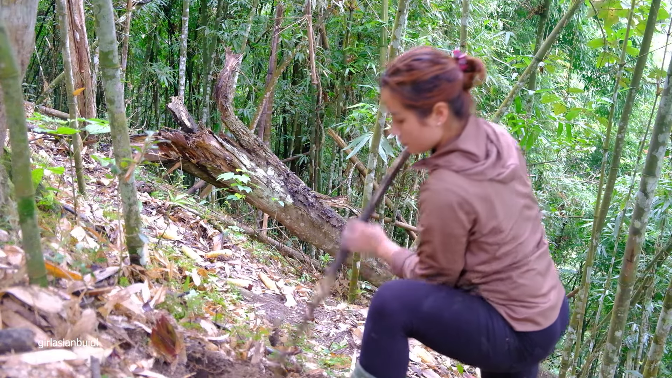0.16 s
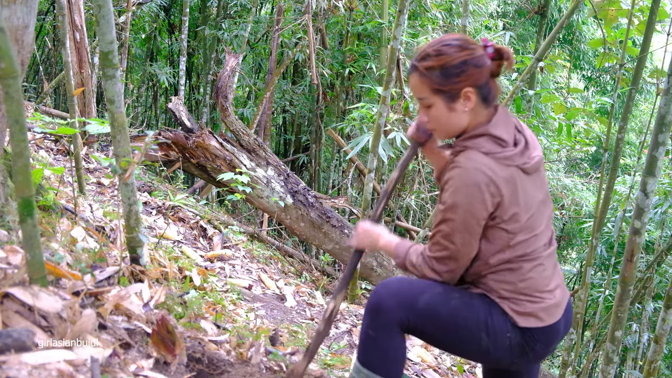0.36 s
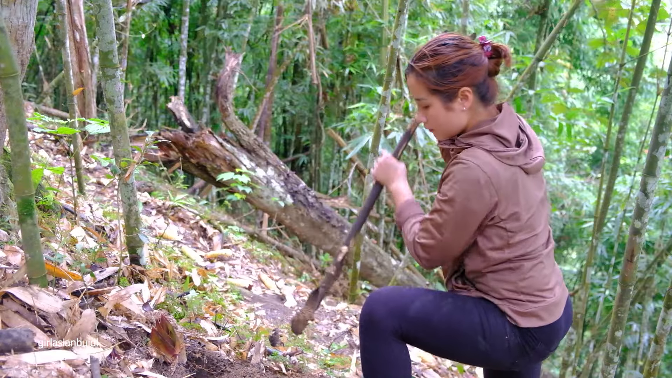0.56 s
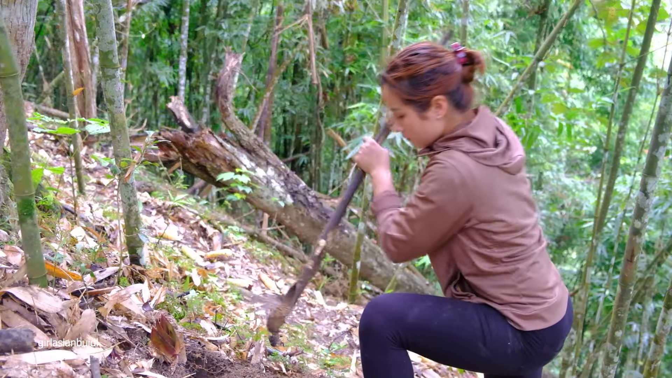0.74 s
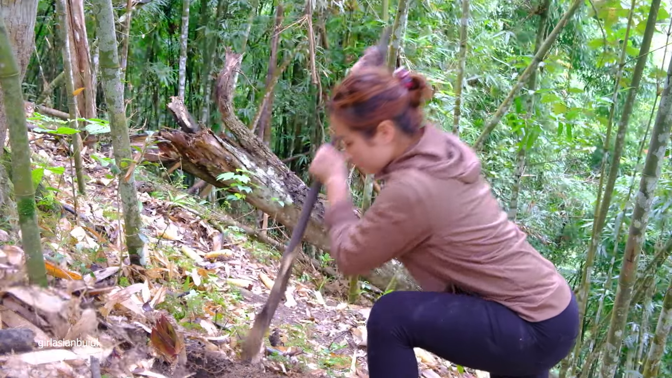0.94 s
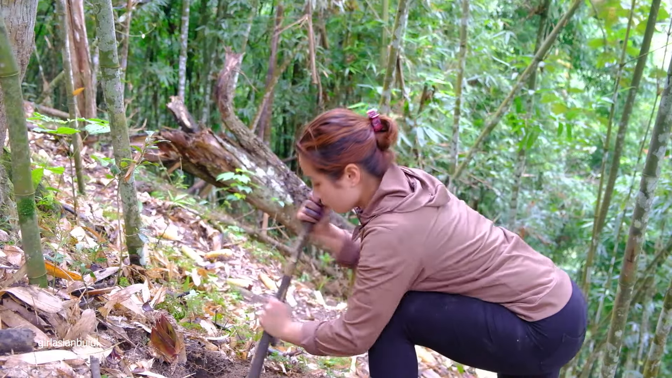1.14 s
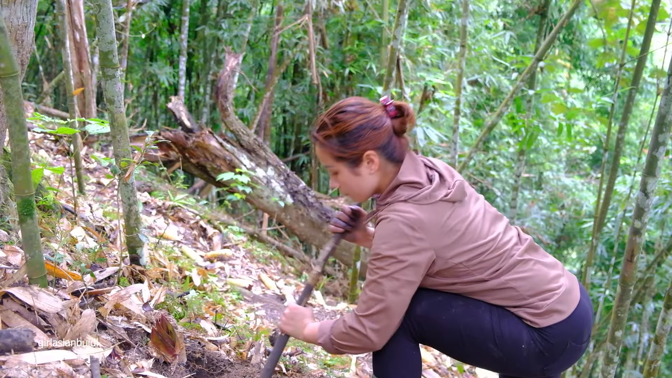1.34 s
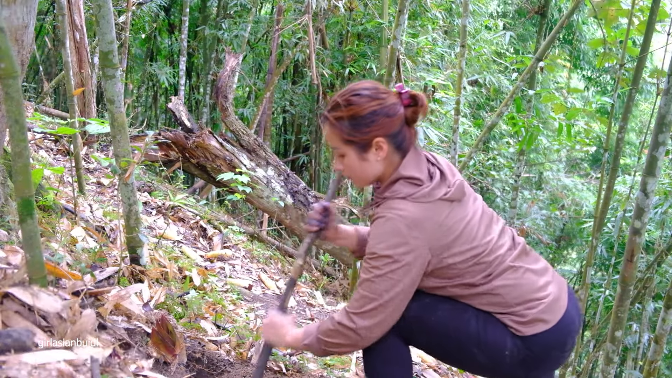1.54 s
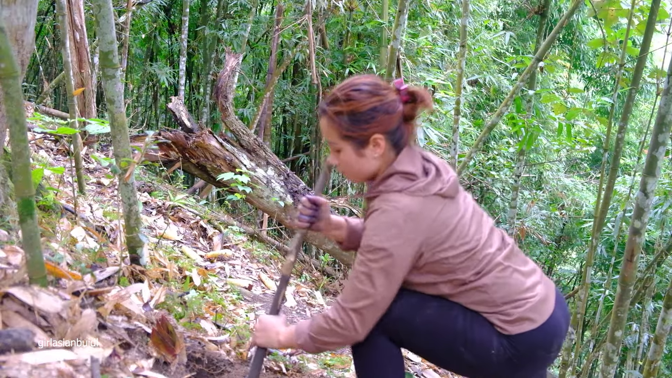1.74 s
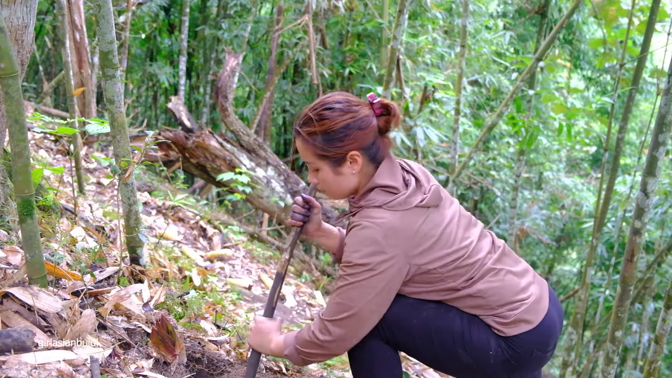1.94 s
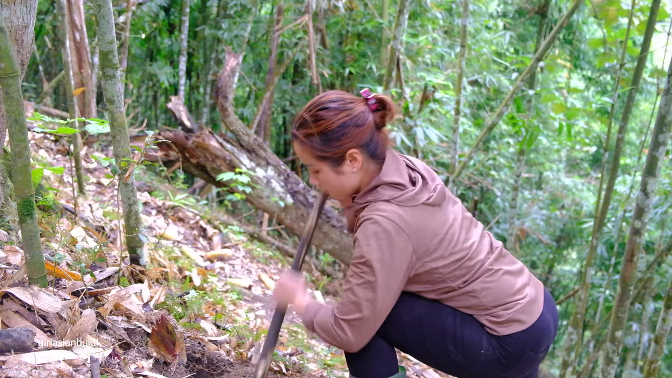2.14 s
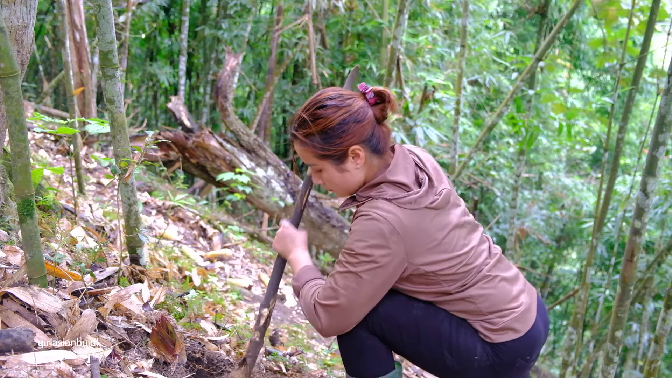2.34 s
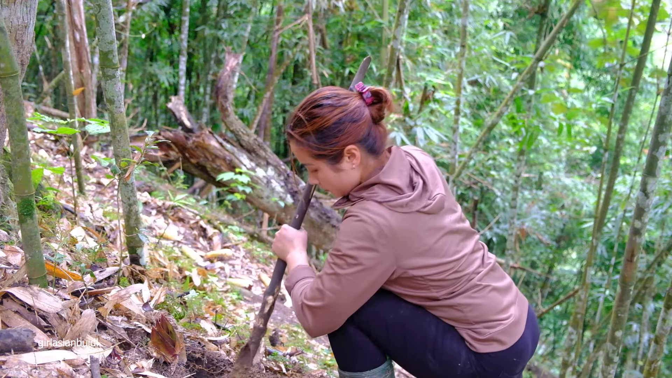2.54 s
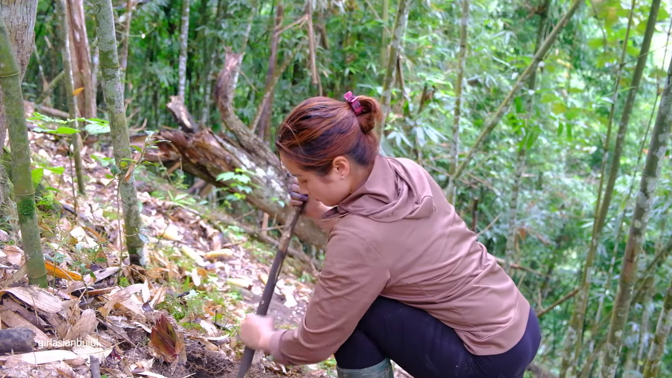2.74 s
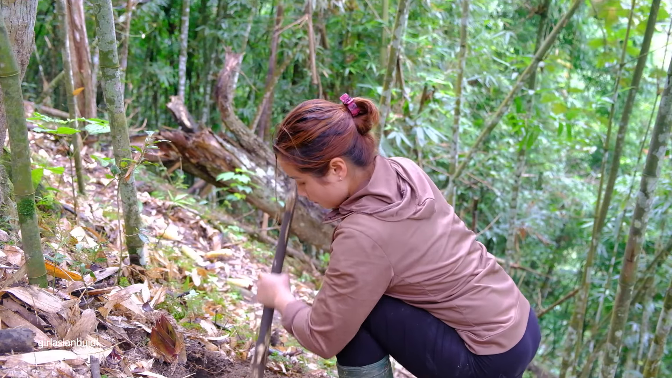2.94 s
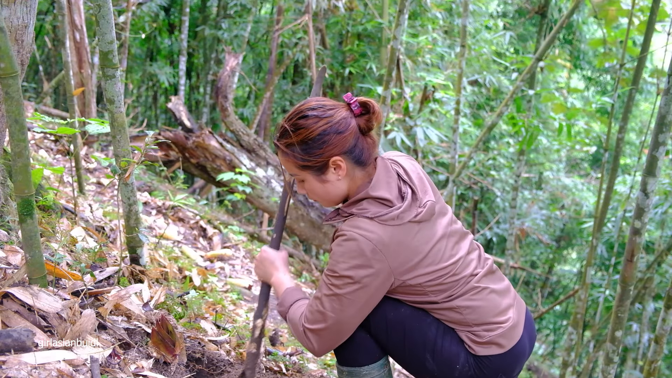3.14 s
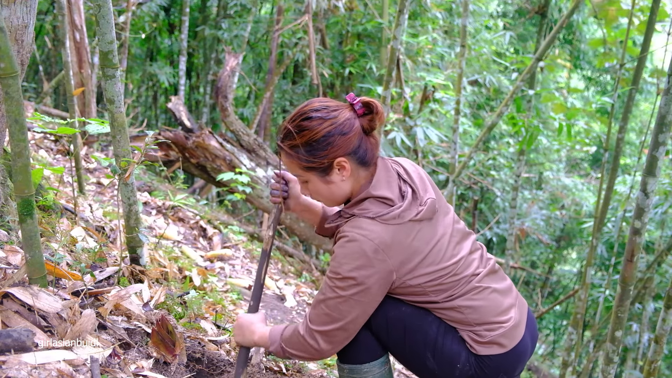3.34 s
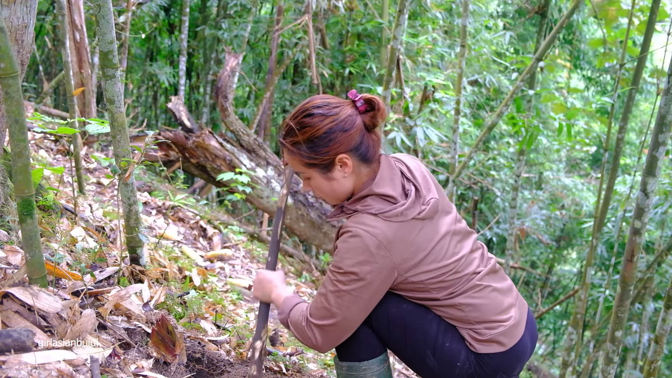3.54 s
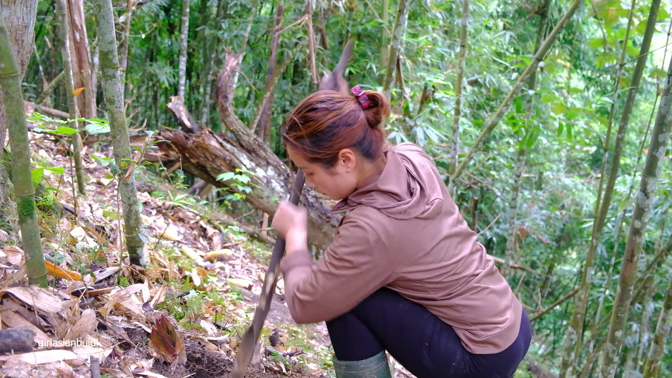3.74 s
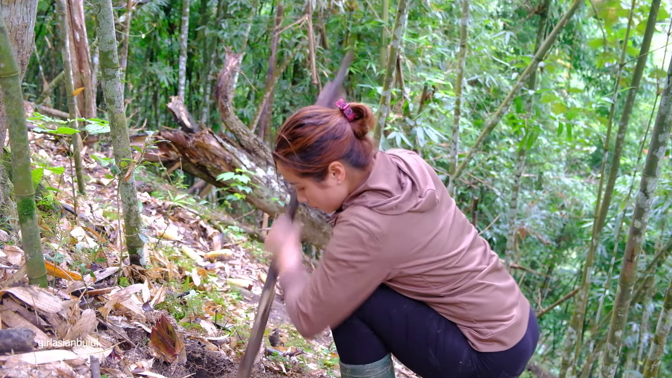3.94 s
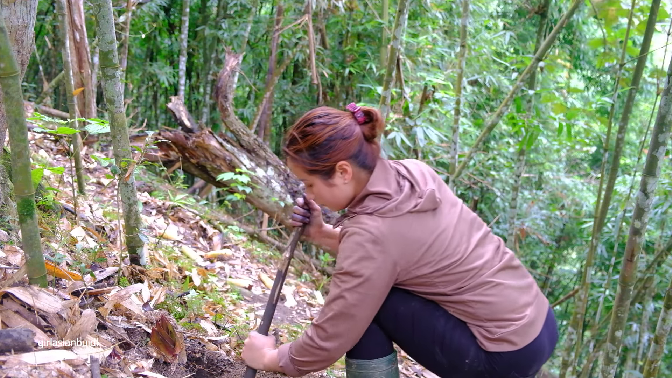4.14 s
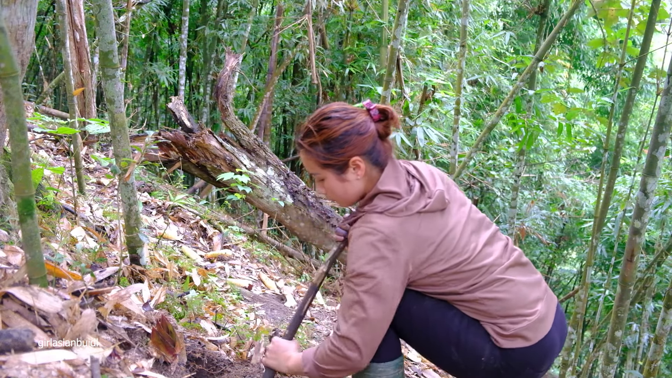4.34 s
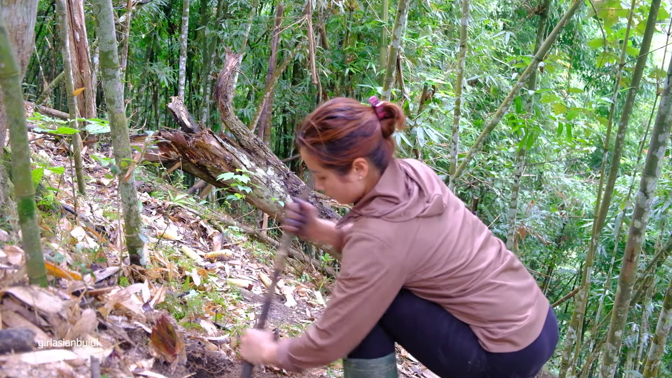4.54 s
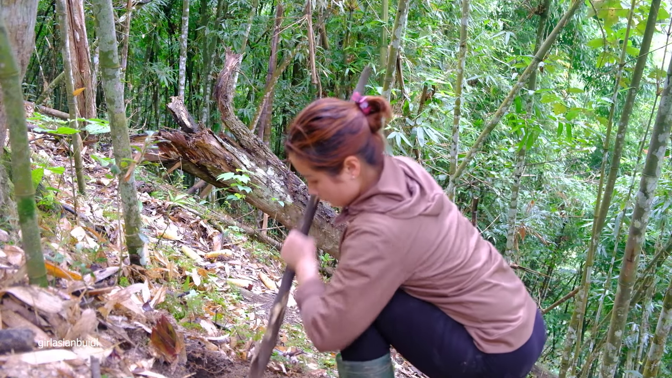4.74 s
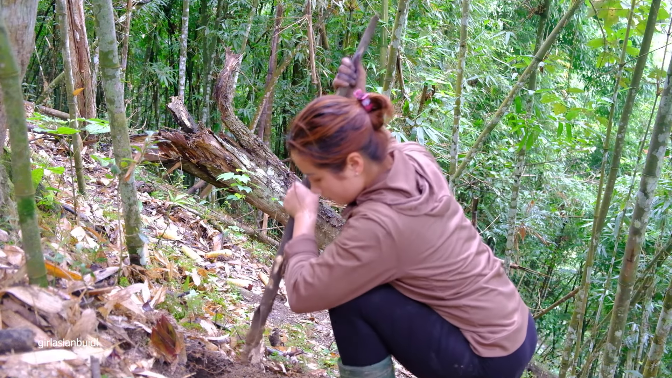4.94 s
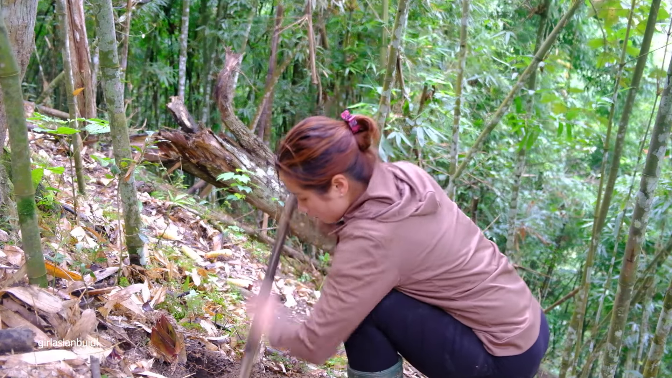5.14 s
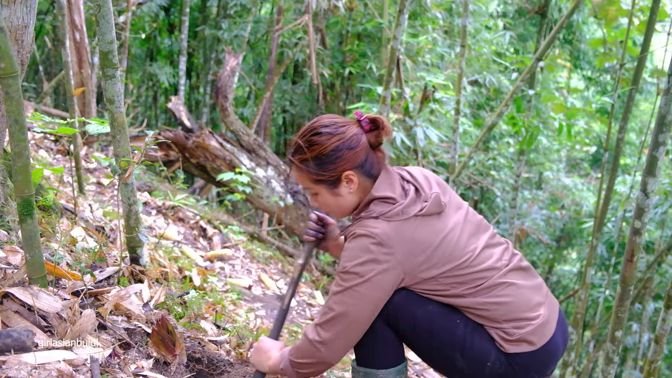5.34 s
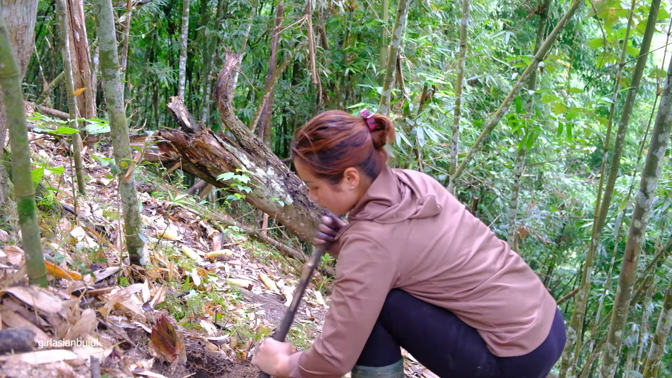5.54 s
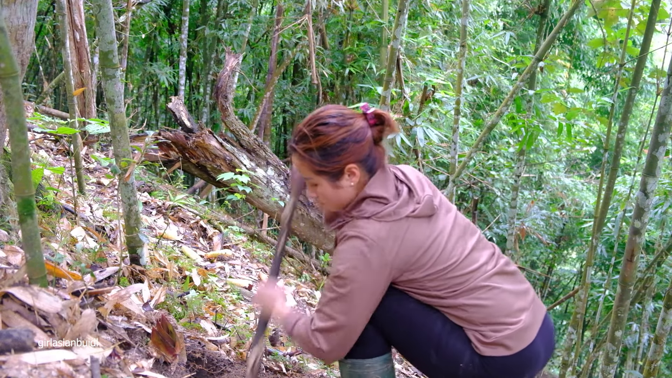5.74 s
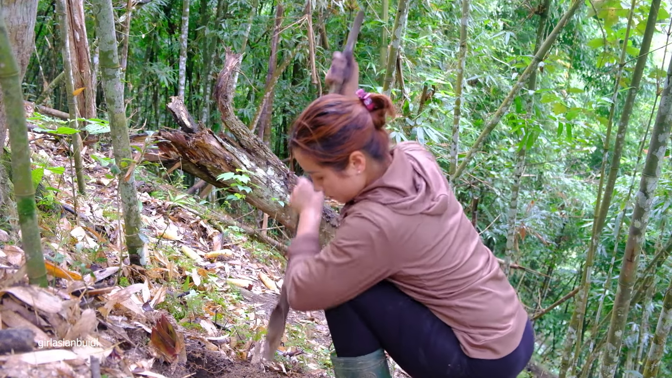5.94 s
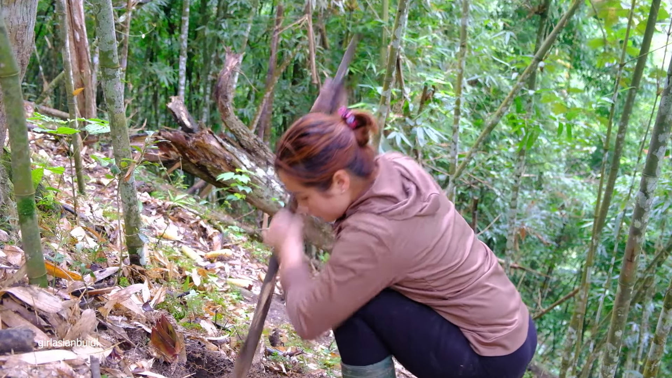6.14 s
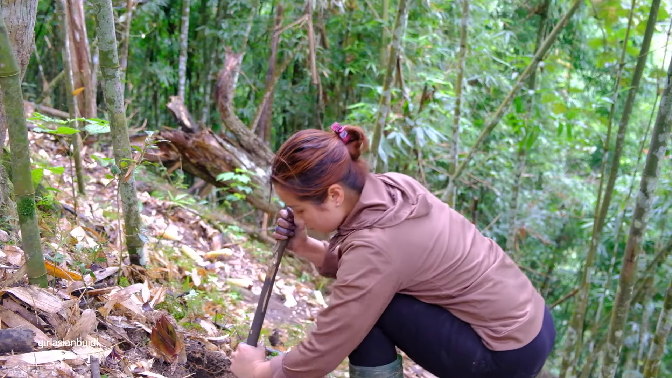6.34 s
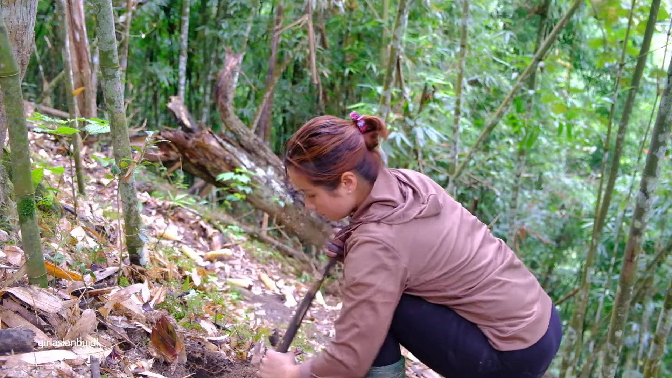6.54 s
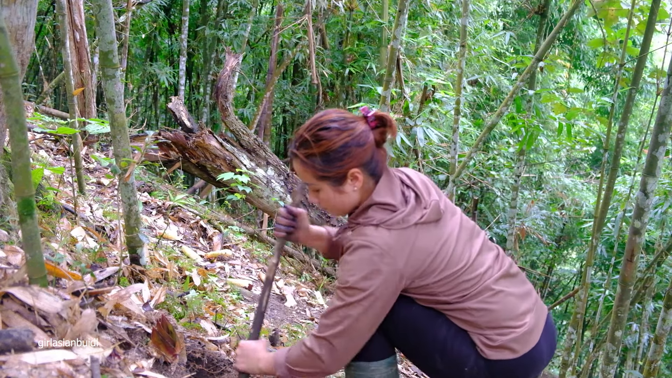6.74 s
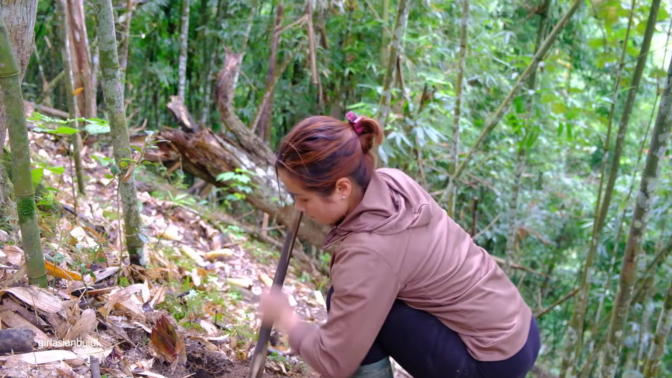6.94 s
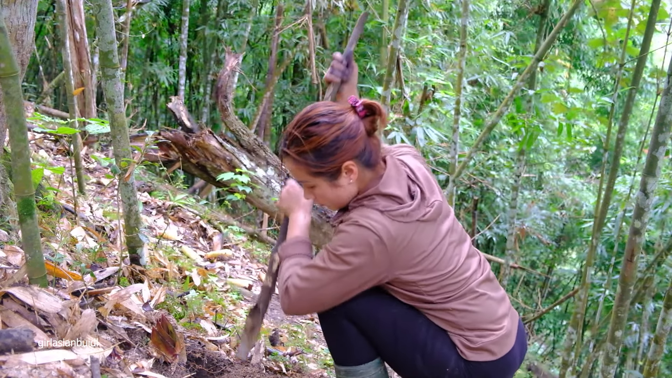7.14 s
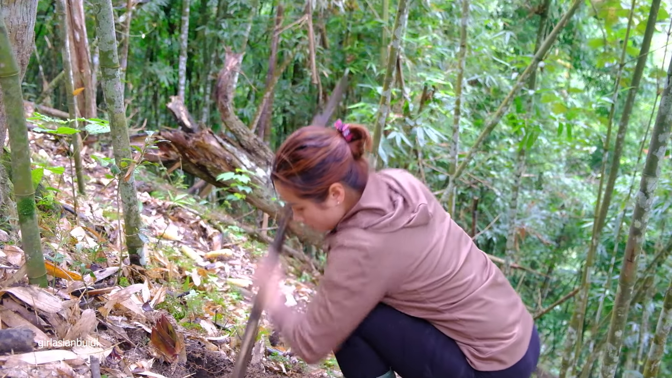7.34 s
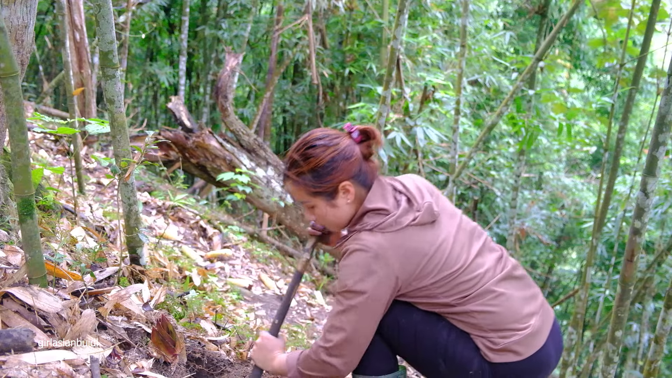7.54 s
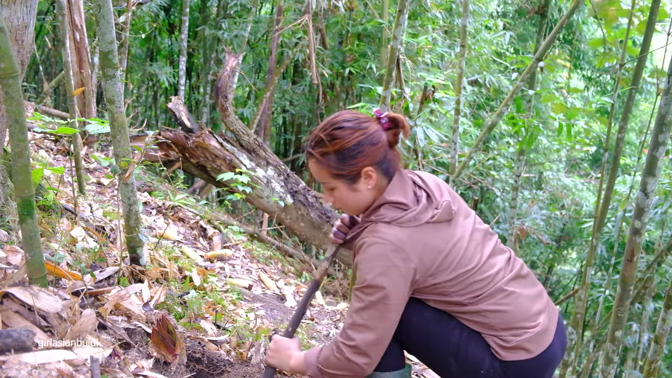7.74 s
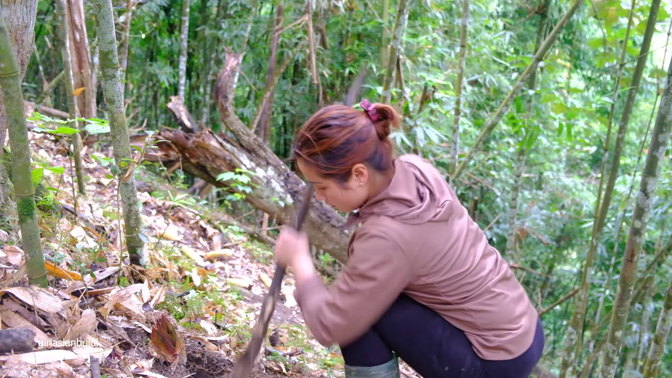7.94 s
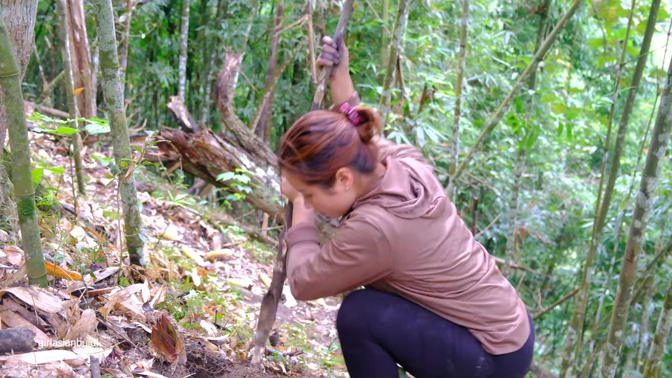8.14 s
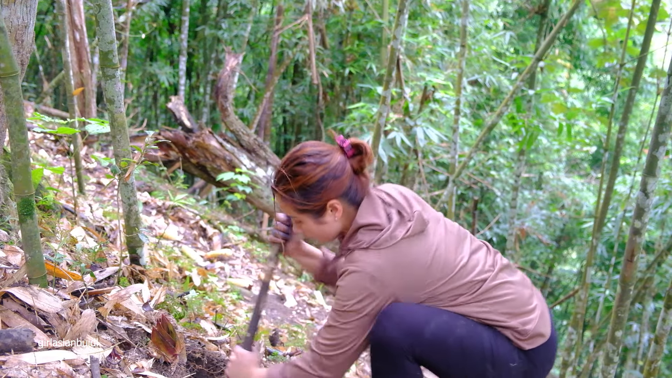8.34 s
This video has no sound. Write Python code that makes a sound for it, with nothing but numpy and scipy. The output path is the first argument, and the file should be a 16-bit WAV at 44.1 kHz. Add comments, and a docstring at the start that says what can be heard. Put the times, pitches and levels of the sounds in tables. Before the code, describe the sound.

A heavy metal digging bar strikes rooty soil close to a stereo microphone, eight times in eight seconds. Each blow is a short woody knock and dull thud with gritty cracking, a brief damped metallic clank and crumbs trickling. Light scuffs fall between. Around it, insects drone steadily outdoors and a farther cicada rasps upward every 1.6 seconds; a distant engine hums barely audibly.

```python
"""Forest floor: a long steel digging bar chops eight times into rooty soil; bar and boots scuff it around the blows.
Each blow: fractures of roots and grit, damped swings for knock and thud, a ground shudder, a spill of crumbs.
A jolt on entry, a jolt on stopping and random chatter ring the bar's modes. Insects drone all around
(shaped noise) in still air, one cicada repeats a rising rasp (buzz on a gliding carrier plus hiss),
a small insect chirrs once close by, and an engine hums far away (three sine lines)."""
import sys
import numpy as np
from scipy import signal
from scipy.fft import rfft, irfft, next_fast_len
from scipy.io import wavfile
from scipy.ndimage import uniform_filter1d, map_coordinates

SR = 44100
rng = np.random.default_rng(int(sys.argv[2]) if len(sys.argv) > 2 else 0)


def wrap_up_sound(samples):
    """Save the sound to the file named by the first command line argument, as 16-bit audio."""
    columns = np.atleast_2d(samples).T
    # keep every value between -1 and 1, then stretch to whole-number steps
    tamed = np.clip(columns, -1, 1)
    steps = np.round(tamed * 32767).astype(np.int16)
    wavfile.write(sys.argv[1], SR, steps)


N = 369909

# blows: blade stop t/s, travel through soil/s, force/dB, knock f/Hz, then knock, thud, ground level/dB over force
BLOWS = [(1.1246, 0.0029, -29, 390, 9.5, -15, -8), (2.793, 0.0029, -30.5, 340, 7.5, 6, -11),
         (3.3303, 0.016, -35.5, 387, 4.5, -3.5, -19), (4.0719, 0.0023, -28.5, 413, 11, 3.5, -6),
         (5.234, 0.0094, -30, 401, 7.5, 4, -7), (6.2943, .010, -30.5, 342, 4, -2, -8),
         (7.4369, 0.0019, -20.5, 345, 6, 2, -15), (8.3732, 0.014, -27.5, 345, -6, -24, -9)]
# blade edge snaps a twig or meets a pebble: t/s, level/dB
SNAPS = [(1.1088, -31), (2.7702, -37), (2.785, -40), (3.3112, -35.5), (4.0689, -28.5), (7.4342, -25),
         (7.4383, -22.5), (8.3544, -34)]
# bar and boots scuff the soil: t/s, decay each side/s, level/dB, contact hardness/dB
SCUFFS = [(.274, 0.0096, -46.5, 3.5), (0.382, 0.018, -59.5, 7), (0.579, 0.09, -51, -4),
          (1.427, 0.0073, -54, -10), (2.16, .012, -51.5, -3), (2.178, 0.0045, -37, -7.5),
          (2.937, 0.027, -49.5, -17), (4.667, .013, -51, 2), (5.755, 0.011, -49.5, -3),
          (6.585, 0.014, -51.5, -2), (6.955, 0.017, -52, -2), (7.692, 0.036, -53.5, -30),
          (7.882, 0.009, -46.5, -13)]
# bending modes of the bar, damped by hands and soil: f/Hz, width/Hz, relative level/dB
BAR_MODES = [(588, 54, 2.5), (797, 67, 4), (985, 300, -4), (1250, 79, 5), (1557, 61, 1.5), (1960, 170, -2),
             (3124, 210, -1), (3366, 100, -1.5)]
# relative spectra of grit, soil, forest floor: f/Hz, density/dB per Hz
GRIT_SPECTRUM = [(300, -15.5), (1200, 3.5), (2000, -0.5), (3100, 3.5), (4800, 1.5), (6500, -1.5),
                 (9000, -7.5), (12000, -14), (14000, -9.5), (16000, -22)]
SOIL_SPECTRUM = [(30, -28), (100, -10), (220, -5.5), (380, -0.5), (700, -10.5), (1300, -15), (2200, -16.5),
                 (4500, -18), (12000, -72)]
GROUND_SPECTRUM = [(15, -20), (28, -4.5), (55, -2), (100, 0.5), (140, -1), (220, -13), (500, -51),
                   (2000, -85)]
# cicada calls: t/s, level/dB
CALLS = [(.105, -42.5), (1.727, -42.7), (3.35, -42.7), (4.98, -42.5), (6.581, -42.7), (8.199, -43)]
# sidebands of the tymbal buzz: offset from pitch/multiples of buzz rate, level/dB
SIDEBANDS = [(-1, -10), (0, -5), (1, -10), (2, -14)]
# relative spectrum of the cicada's hiss: f/Hz, density/dB per Hz
HISS_SPECTRUM = [(5500, -5), (7500, -5.5), (8600, -4.5), (9900, -1.5), (11300, -4.5), (12000, -12.5),
                 (12900, -19), (14300, -12), (15500, -11.5)]
# scatter from the stems: f/Hz, relative level/dB
SCATTER = [(200, 3), (1000, -14), (3500, 14)]
# decay of the scatter: f/Hz, t60/s
FOREST_T60 = [(100, 0.51), (500, 0.12), (3000, 0.17), (6000, 0.58), (14000, 0.32)]
# relative spectra of insect chorus and still air: f/Hz, density/dB per Hz
CHORUS_SPECTRUM = [(1500, -32.5), (2000, -8.5), (2450, 0.5), (3200, 0), (3700, -10.5), (4400, -7),
                   (5050, -6.5), (6000, -14.5), (7000, -23), (8500, -33.5), (15000, -42)]
AIR_SPECTRUM = [(15, -15), (35, 4), (50, 9), (65, 6), (150, 1.5), (230, 0), (700, -0.5), (1050, -1),
                (1270, 0), (1500, -3.5), (4000, -3.5), (8000, -17), (15000, -26)]
# left-right likeness of chorus and air: f/Hz, correlation/1
LIKENESS = [(30, 0.11), (150, 0.35), (1000, 0.66), (2800, 0.75), (5000, 0.16), (9000, 0.1)]
# far engine speed: t/s, turns per second/Hz
ENGINE_SPEED = [(0, 36.5), (1, 34.5), (1.701, 35.5), (3.7, 33.5), (4.7, 33), (8.4, 34.5)]
# far engine lines: multiple of the turn rate/1, level/dB
ENGINE_LINES = [(3, -71.5), (4, -68), (5, -74)]

# gains over blow force
ENTRY_JOLT_DB, STOP_JOLT_DB, DRAG_DB, GRIT_DB = 17.5, 20.5, -4, -7
CRUMBS_DB, CLODS_DB = -13, -23  # fine and coarse spill
# firmer soil stops the blade sooner and thuds higher
THUD_HZ, THUD_TRAVEL_S, THUD_STIFFENING_POWER = 165.5, 0.004, 0.18
SCUFF_GRIT_DB, GRIT_DB_PER_HARDNESS_DB = -0.5, 0.61  # harder contact loosens more grit
HEAVE_S, HEAVE_DB = 0.284, -45.5  # bar levered out of the hole
CALL_S, SWELL_S, RELEASE_S = 0.8, 0.16, 0.25
LOW_HZ, HIGH_HZ, CLIMB_S, CLIMB_POWER = 3269, 4872, 0.46, 1.45
HISS_DELAY_S, HISS_RISE_S = 0.046, 0.12
HISS_SAG = 0.1  # share by which the hiss darkens in the release
CHIRR_S, CHIRR_LENGTH_S, CHIRR_HZ, CHIRR_DB = 1.25, 0.55, 6700, -66
TOP_HZ = 15800


def digging():
    """Breaking soil, knocks, ground and ringing bar, driven by the summed envelopes of all contacts."""
    names = ["low", "sway", "jolts", "scrape", "grit", "crumbs", "soil"]
    drive = dict(zip(names, np.zeros((7, N))))
    blows(drive)
    snaps(drive)
    scuffs(drive)
    heave(drive)
    chatter = drive["scrape"] * fractures(rate_hz=3000, spread_db=5)
    ring = filtered(drive["jolts"] + chatter, bar_ring)
    shudder = coloured(drive["sway"] * fractures(rate_hz=3000, spread_db=3.5), GROUND_SPECTRUM)
    breaking = drive["grit"] * fractures(rate_hz=5900, spread_db=6, scatter=0.12)
    trickle = drive["crumbs"] * fractures(rate_hz=3000, spread_db=4.5, scatter=0.97)
    gritty = coloured(breaking + trickle, GRIT_SPECTRUM)
    earthy = coloured(drive["soil"] * fractures(rate_hz=3000, spread_db=-1.0), SOIL_SPECTRUM)
    return drive["low"] + shudder + ring + gritty + earthy


def blows(drive):
    """Roots and grit break while the blade travels; it stops with knock and thud, crumbs trickle after."""
    for s, travel_s, force_db, knock_hz, knock_db, thud_db, ground_db in BLOWS:
        span, t = around(s)
        force = amp(force_db)
        thud_hz = THUD_HZ * (THUD_TRAVEL_S / travel_s) ** THUD_STIFFENING_POWER
        # full level throughout the travel
        cutting = force * burst(t - np.clip(t, -travel_s, 0), rise_s=0.002, t60_s=0.054)
        settling = force * burst(t - 0.008, rise_s=0.0024, t60_s=0.22)
        knock = swing(t, knock_hz, rise_s=0.0025, t60_s=0.038)
        thud = swing(t - 0.003, thud_hz, rise_s=0.0021, t60_s=0.034)
        drive["low"][span] += force * (amp(knock_db) * knock + amp(thud_db) * thud)
        drive["sway"][span] += force * amp(ground_db) * ground(t)
        # bar: jolt on entry, chatter on the way, jolt on stopping
        drive["jolts"][round((s - travel_s) * SR)] += force * amp(ENTRY_JOLT_DB)
        drive["scrape"][span] += amp(DRAG_DB) * cutting
        drive["jolts"][round(s * SR)] += force * amp(STOP_JOLT_DB)
        drive["soil"][span] += cutting + amp(CLODS_DB) * settling
        drive["grit"][span] += amp(GRIT_DB) * cutting
        drive["crumbs"][span] += amp(CRUMBS_DB) * settling


def snaps(drive):
    """A twig or pebble at the blade edge: abrupt onset, short decay of breaking."""
    for s, db in SNAPS:
        span, t = around(s)
        drive["grit"][span] += amp(db) * burst(t, rise_s=0.000055, t60_s=0.011)


def scuffs(drive):
    """Strokes on the soil; harder contact shakes the bar and loosens grit."""
    for s, length_s, db, hard_db in SCUFFS:
        span, t = around(s)
        stroke = amp(db) * np.exp(-np.abs(t / length_s))
        drive["soil"][span] += stroke
        drive["crumbs"][span] += amp(SCUFF_GRIT_DB + GRIT_DB_PER_HARDNESS_DB * hard_db) * stroke
        drive["scrape"][span] += amp(hard_db) * stroke


def heave(drive):
    """Levering the bar out pushes the ground once."""
    span, t = around(HEAVE_S)
    drive["sway"][span] += amp(HEAVE_DB) * ground(t)


def ground(t, lag_s=0.0064):
    """The soft forest floor shudders a moment after it is pushed."""
    return burst(t - lag_s, rise_s=0.0057, t60_s=0.18)


def bar_ring(hz):
    """Response of the bar's short-lived bending modes with alternating signs, at unit power."""
    total = 0
    for k, (centre_hz, width_hz, db) in enumerate(BAR_MODES):
        damping = 1j * hz * width_hz
        total = total + (-1) ** k * amp(db) * damping / (centre_hz ** 2 - hz ** 2 + damping)
    return unit(total)


def swing(t, hz, rise_s, t60_s):
    """Pressure from a damped oscillation (slope of its motion), rms near 1 at its loudest."""
    motion = burst(t, rise_s, t60_s) * np.sin(2 * np.pi * hz * t)
    return np.sqrt(2) * np.gradient(motion, t) / (2 * np.pi * hz)


def fractures(rate_hz, spread_db, scatter=0):
    """Tiny breaks, random in time and size, rms 1; scatter makes each differ between the ears."""
    sizes = amp(spread_db * rng.uniform(-0.77, 1, N)) * rng.choice([-1, 1], N)
    breaks = sizes * (rng.random(N) < rate_hz / SR)
    return unit(breaks * (1 + scatter * rng.standard_normal((2, N))))


def chirr(width_hz=1100, fade_s=0.06, flicker_db=4, flicker_rate_hz=90):
    """A small insect in the near leaf litter: a faint, high, flickering noise band."""
    t = clock() - CHIRR_S
    flicker = amp(flicker_db * wobble(flicker_rate_hz))
    band = unit(wobble(width_hz) * flicker * np.sin(2 * np.pi * CHIRR_HZ * t))
    return amp(CHIRR_DB) * ramp(t, fade_s) * ramp(CHIRR_LENGTH_S - t, fade_s) * band


def cicada(buzz_hz=370, flutter_rate_hz=260, haze_rate_hz=1100, haze_db=-8, octave_db=-23,
           hiss_db=-16, hiss_glide_power=0.45):
    """Ragged tymbal buzz around a resonance pulled upward, held, then released in each call."""
    t = clock()
    climb, level, hiss_level, release = np.zeros((4, N))
    for s, db in CALLS:
        on = (t >= s) & (t < s + CALL_S)
        since = t[on] - s
        climb[on] = ramp(since, CLIMB_S) ** CLIMB_POWER
        release[on] = ramp(since - (CALL_S - RELEASE_S), RELEASE_S)
        held = amp(db) * (1 - release[on])
        level[on] = held * (1 - np.exp(-since / SWELL_S))
        hiss_level[on] = held * ramp(since - HISS_DELAY_S, HISS_RISE_S)
    pitch_hz = LOW_HZ + (HIGH_HZ - LOW_HZ) * climb
    carrier = np.exp(2j * np.pi * np.cumsum(pitch_hz) / SR)
    # uneven clicks blur each sideband into a narrow band
    buzz = 0
    for k, side_db in SIDEBANDS:
        blur = wobble(flutter_rate_hz) + 1j * wobble(flutter_rate_hz)
        buzz = buzz + amp(side_db) * blur * np.exp(2j * np.pi * k * buzz_hz * t)
    # rougher haze around the main band and its octave
    haze = unit(buzz * (wobble(haze_rate_hz) + 1j * wobble(haze_rate_hz)))
    song = np.real(buzz * carrier + haze * (amp(haze_db) * carrier + amp(octave_db) * carrier ** 2))
    # click edges hiss above; slower reading darkens the noise, so it follows pitch and sags in release
    speed = (pitch_hz / HIGH_HZ) ** hiss_glide_power * (1 - HISS_SAG * release)
    read = np.cumsum(speed)
    noise = coloured(rng.standard_normal((2, N)), HISS_SPECTRUM)
    hiss = np.array([map_coordinates(side, [read], order=5) for side in noise])
    return level * song + amp(hiss_db) * hiss_level * hiss


def forest(x):
    """Scatter from the stems: a different diffuse tail at each ear, weakest near 1 kHz."""
    hz, t, z = signal.stft(rng.standard_normal((2, SR // 2)), SR, nperseg=256)
    tail_db = along(SCATTER, hz)[:, None] - 60 * t / along(FOREST_T60, hz)[:, None]
    tail = signal.istft(z * amp(tail_db), SR, nperseg=256)[1]
    return signal.fftconvolve(x, tail / np.linalg.norm(tail[0]), axes=1)[:, :N]


def insect_chorus():
    """Drone of many insects: banded stereo noise of slightly wavering level."""
    return amp(-51.0 + 0.072 * wobble(6.1)) * rush(CHORUS_SPECTRUM, patchy_db=0.97)


def still_air():
    """Faint broad noise of the open air."""
    return amp(-58.0) * rush(AIR_SPECTRUM, patchy_db=1.24)


def engine():
    """Only a few low lines of the far engine carry; speed and levels waver slightly."""
    turns_hz = np.interp(clock(), *np.transpose(ENGINE_SPEED)) + 0.388 * wobble(6)
    phase = 2 * np.pi * np.cumsum(turns_hz) / SR
    return sum(amp(db + 0.45 * wobble(3.23)) * np.sin(k * phase) for k, db in ENGINE_LINES)


def rush(spectrum, patchy_db):
    """Stereo noise, rms 1, in time-frequency patches of random gain; correlation set per frequency."""
    z = signal.stft(rng.standard_normal((2, N)), nperseg=512)[2]
    field = uniform_filter1d(rng.standard_normal(z.shape[1:]), size=5, axis=0)
    field = uniform_filter1d(field, size=14, axis=1)
    pair = signal.istft(z * amp(patchy_db * unit(field)), nperseg=512)[1][:, :N]

    def mid_side(hz):
        """Mid and side gains that give the correlation."""
        turn = np.arccos(np.clip(along(LIKENESS, hz), -1, 1)) / 2
        return amp(along(spectrum, hz)) * [np.cos(turn), np.sin(turn)]

    mid, side = filtered(pair, mid_side)
    return unit(np.array([mid + side, mid - side]))


def amp(db):
    """Decibels to gain."""
    return 10 ** (np.asarray(db) / 20)


def unit(x):
    """Scale to rms 1."""
    return x / np.sqrt(np.mean(np.abs(x) ** 2) + 1e-20)


def along(points, hz):
    """(f/Hz, value) points read on a log axis."""
    f, v = np.transpose(points)
    return np.interp(np.log(hz + 1), np.log(f + 1), v)


def clock():
    """Time of every sample/s."""
    return np.arange(N) / SR


def around(s):
    """Samples near a moment, and their times from it/s."""
    span = slice(max(int(s * SR) - SR // 8, 0), min(int(s * SR) + SR // 2, N))
    return span, clock()[span] - s


def ramp(t, length_s):
    """Straight rise from 0 at t = 0 to 1 after the given length."""
    return np.clip(t / length_s, 0, 1)


def burst(t, rise_s, t60_s):
    """Envelope peaking at t = 0: bell-shaped rise, exponential decay."""
    rise = np.exp(-np.minimum((np.minimum(t, 0) / rise_s) ** 2, 50))
    return rise * amp(-60 * np.maximum(t, 0) / t60_s)


def wobble(rate_hz):
    """Smooth random curve through rate_hz knots a second."""
    knots = rng.standard_normal(int(N * rate_hz / SR) + 4)
    return map_coordinates(knots, [np.arange(N) * rate_hz / SR])


def filtered(x, response):
    """x times a complex response of frequency."""
    size = next_fast_len(N + SR // 2)
    return irfft(rfft(x, size) * response(np.fft.rfftfreq(size, 1 / SR)), size)[..., :N]


def coloured(x, spectrum, size=4096):
    """Causal minimum-phase filter of unit energy, folded from the cepstrum."""
    cepstrum = irfft(np.log(amp(along(spectrum, np.fft.rfftfreq(size, 1 / SR)))))
    cepstrum[1:size // 2] *= 2
    cepstrum[size // 2 + 1:] = 0
    kernel = irfft(np.exp(rfft(cepstrum)))
    return signal.oaconvolve(x, kernel[None] / np.linalg.norm(kernel), axes=1)[:, :N]


def scene():
    """Close digging, a cicada deep among the stems, insect chorus, still air, far engine."""
    dig, call = digging(), cicada()
    near = dig * amp([[-0.4], [0.4]]) + amp(-15) * forest(dig) + chirr()
    far = amp(-1.5) * call + amp(-2.0) * forest(call)
    return near + far + insect_chorus() + still_air() + engine()


def record(dry, lead_samples=2.84, lead_top_hz=4100):
    """Left microphone leads slightly, its phase lead levelling off in the treble; then the band limit."""
    def response(hz):
        """Half the lead on each side, opposite in sign."""
        half_lead = np.pi * np.minimum(hz, lead_top_hz) * lead_samples / SR
        return (hz < TOP_HZ) * np.exp(1j * half_lead * np.array([[1], [-1]]))

    return filtered(dry, response)


dry = scene()
out = record(dry)
wrap_up_sound(out)
```